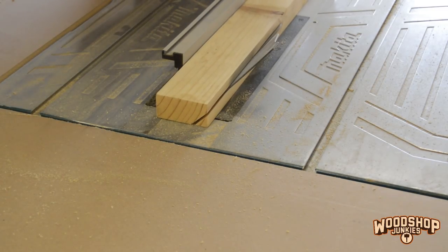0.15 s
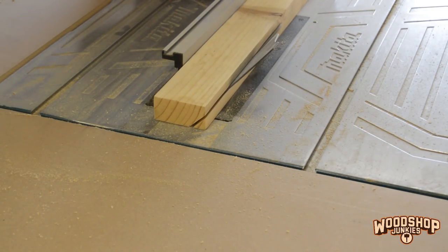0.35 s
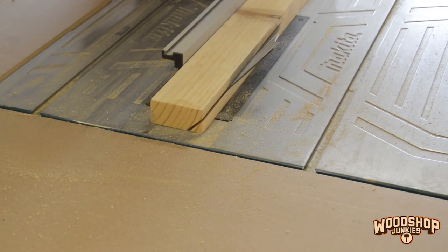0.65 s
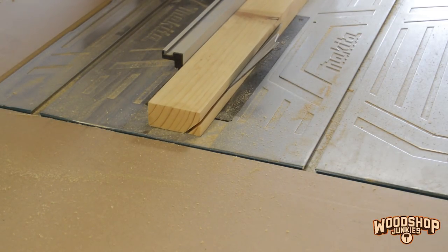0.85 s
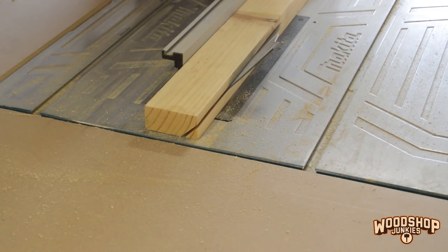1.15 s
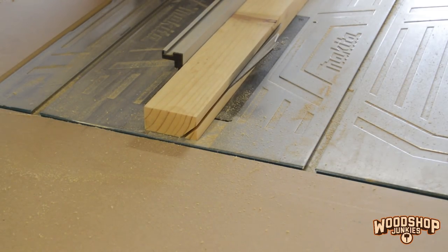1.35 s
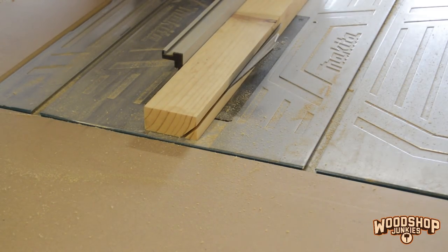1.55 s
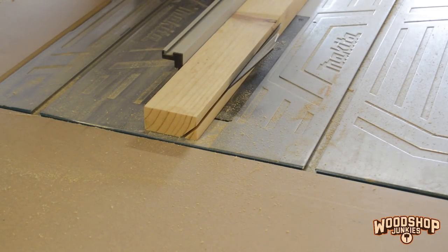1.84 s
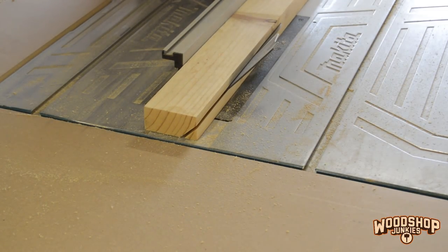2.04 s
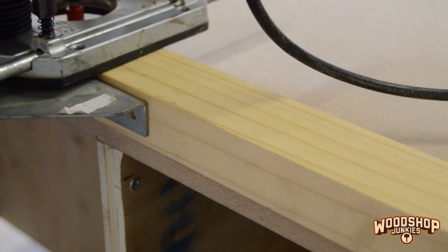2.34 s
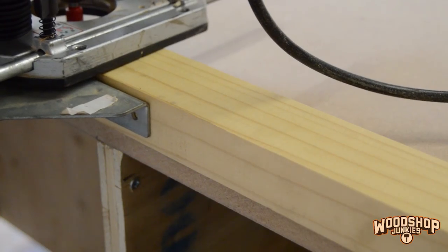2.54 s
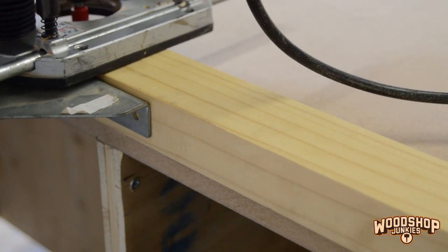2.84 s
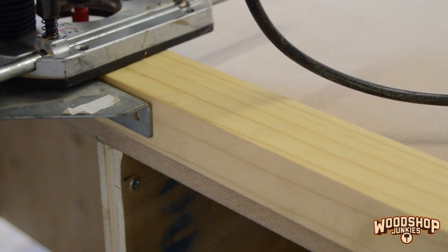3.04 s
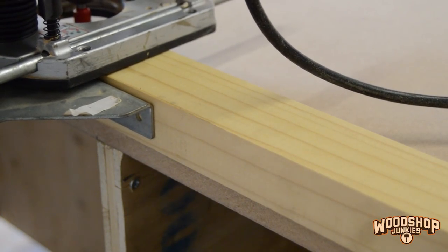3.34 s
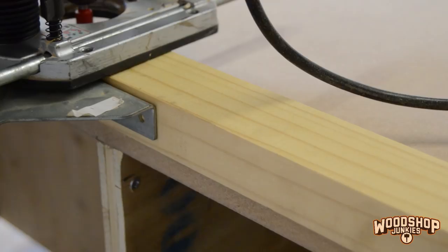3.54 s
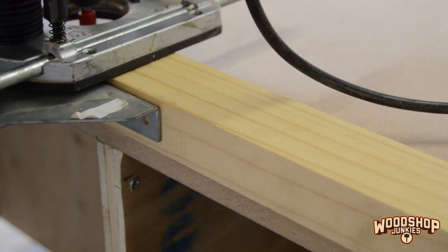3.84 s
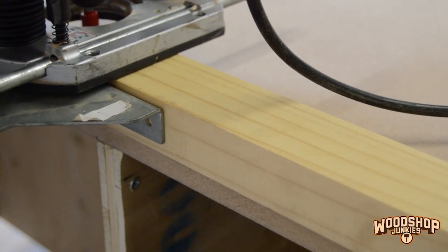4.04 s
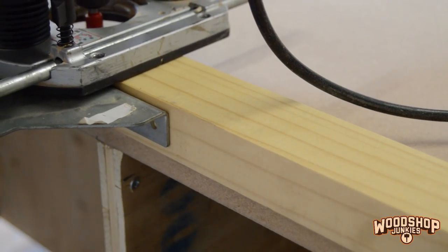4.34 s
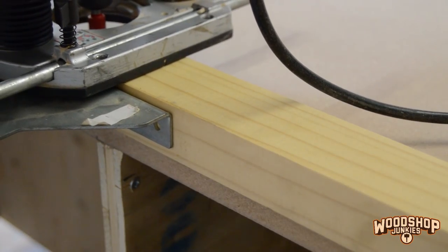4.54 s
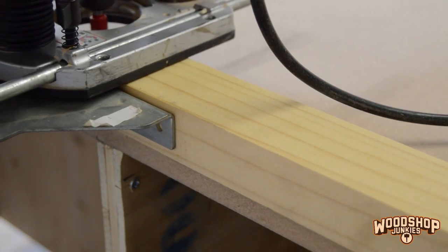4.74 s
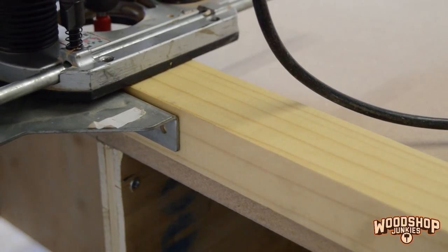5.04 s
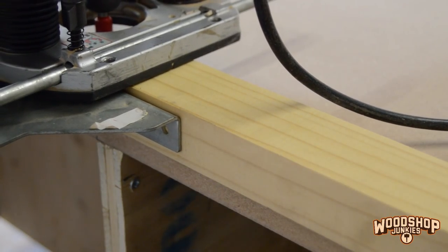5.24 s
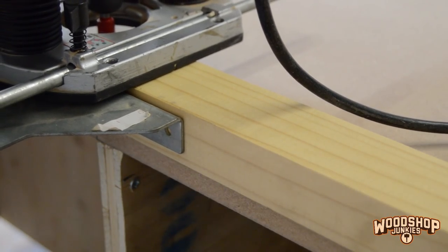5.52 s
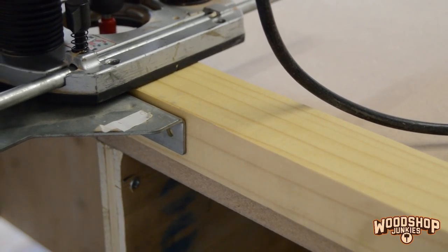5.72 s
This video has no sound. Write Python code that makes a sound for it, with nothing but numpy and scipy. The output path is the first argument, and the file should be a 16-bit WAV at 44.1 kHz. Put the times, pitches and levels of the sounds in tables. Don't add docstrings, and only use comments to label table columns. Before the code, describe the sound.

Close, dry, essentially mono workshop sound, continuously loud. From 0 to 1.3 s a table saw rips pine: a tooth whine near 2.6 kHz, wavering in strength, inside wide gritty chip noise and air hiss, with low table rumble and faint motor hum. Around 1.4 to 1.5 s the strip lets go, with a ringing squeal; the offcut drags and chatters at 1.6 to 1.75 s, then the cutting tone weakens while the pitch slides up to about 2.8 kHz. At 2.32 s it cuts instantly to a hand router coasting down with a lower, breathy whirr. At 2.51 s it kicks on with a short rough jolt, zips up to a peak at 2.7 s, and sags until 3.02 s. Then it surges again, climbing fast and then gradually to full speed by about 4.5 s, holding a steady, bright, rushing whine near 3.8 kHz to the end at about 6 s, still running.

```python
import sys
import numpy as np
from scipy import signal
from scipy.fft import rfft, irfft
from scipy.io import wavfile
from scipy.ndimage import uniform_filter1d

SR = 44100
rng = np.random.default_rng(int(sys.argv[2]) if len(sys.argv) > 2 else 0)


def gain_from_decibels(decibels):
    exponent = np.asarray(decibels, float) / 20
    return 10 ** exponent


def put_to_file(sound):
    columns = np.atleast_2d(sound).T
    safe = np.clip(columns, -1, 1)
    whole_steps = np.round(safe * 32767)
    wavfile.write(sys.argv[1], SR, whole_steps.astype(np.int16))


N = 259308
CUT_S = 2.316
FULL_HZ = 478


def columns(table):
    s, *rest = np.transpose(table)
    return [np.interp(np.arange(N) / SR, s, column) for column in rest]


def around(s, reach_s):
    return slice(max(int((s - reach_s) * SR), 0), int((s + reach_s) * SR))


def window(s, length_s):
    out, near = np.zeros(N), around(s, length_s)
    offset_s = np.arange(N)[near] / SR - s
    out[near] = np.exp(-(offset_s / (length_s / 2)) ** 4)
    return out


def swells(table):
    return sum(db * window(s, length_s) for s, length_s, db in table)


def walk(rate_hz, count):
    hold = int(SR / rate_hz / 16)
    slow = np.repeat(rng.standard_normal(count // (16 * hold) + 2), hold)
    slow = uniform_filter1d(uniform_filter1d(slow, hold), hold)
    return 1.22 * np.interp(np.arange(count) / 16, np.arange(len(slow)), slow)


def tone(hz, turns, multiple, db, flutter_db, blur_rad):
    count = len(hz)
    wander_rad = blur_rad * (walk(40, count) + 0.31 * walk(250, count))
    phase = 2 * np.pi * (multiple * turns + multiple ** 2 / np.pi) + wander_rad
    gain = np.sqrt(2) * gain_from_decibels(db + flutter_db * walk(32, count))
    return gain * np.sin(phase) * (multiple * hz < .45 * SR)


def burst(hz, turns, multiple, db, flutter_db, blur_rad, s, length_s):
    out, near = window(s, length_s), around(s, length_s)
    out[near] *= tone(hz[near], turns[near], multiple, db, flutter_db, blur_rad)
    return out


def rings(table, blur_rad):
    fixed_hz, seconds = np.ones(N), np.arange(N) / SR
    return sum(burst(fixed_hz, seconds, ring_hz, db, 1.2, blur_rad, s, length_s)
               for s, length_s, ring_hz, db in table)


def regions(shares, control_db, speed):
    return [share * control_db + db * speed for share, db in shares]


def rush(colour, hollows, centres_hz, levels_db, patchy_db):
    hz, colour_db = np.transpose(colour)
    freq = np.fft.rfftfreq(N, 1 / SR)
    lift_db = sum(db * np.exp(-((freq - centre_hz) / (width_hz / 2)) ** 2)
                  for centre_hz, width_hz, db in hollows)
    colour_db = np.interp(np.log(freq + 1), np.log(hz), colour_db)
    noise = irfft(rfft(rng.standard_normal(N)) * gain_from_decibels(lift_db + colour_db), N)
    f, t, z = signal.stft(noise, SR, nperseg=512, noverlap=384)
    frame_at = np.minimum(t * SR, N - 1).astype(int)
    swell_db = np.array([region_db[frame_at] for region_db in levels_db])
    place = np.interp(np.log(f + 1), np.log(centres_hz), np.arange(4))
    shares = np.clip(1 - np.abs(place[:, None] - np.arange(4)), 0, 1)
    patches = uniform_filter1d(rng.standard_normal(z.shape), size=9, axis=0)
    patches = uniform_filter1d(patches, size=9, axis=1) * 9
    z = z * gain_from_decibels(shares @ swell_db + patchy_db * patches)
    return signal.istft(z, SR, nperseg=512, noverlap=384)[1][:N]


def nicks(turns, colour):
    hz, db = np.transpose(colour)
    multiples_hz = np.arange(1, 2049) * 65.
    chance = rng.standard_normal((2, 2048))
    gains = gain_from_decibels(np.interp(np.log(multiples_hz), np.log(hz), db) + 4 * chance[0])
    gains = gains * (multiples_hz < hz[-1]) * (multiples_hz > 900)
    turn = irfft(np.append(0, gains * np.exp(9j * chance[1])))
    jittered = turns + .0008 * walk(30, N)
    return np.interp(jittered, np.arange(4096) / 4096, turn / turn.std(), period=1)


def saw_noise(turns, over_pct):
    # (frequency [Hz], level [dB per Hz])
    saw_colour = [(30, -45), (90, -30.5), (150, -8), (220, -16.5), (450, -12), (1000, -12), (2000, -13.5),
                  (2700, -9), (4000, -13), (5000, -9), (6000, -15.5), (10000, -13.5), (12500, -29.5),
                  (16000, -46.5)]
    # (centre [Hz], width [Hz], level [dB])
    saw_hollows = [(379, 100, 2), (498, 68, -5), (929, 98, -1), (1490, 290, -2.5), (3600, 490, 1.5),
                   (4560, 580, -3.5), (5670, 380, -2)]
    # (time [s], level [dB])
    rub = [
        (0, 1.5),
        (1.0, 1.5),
        (1.25, -0.5),
        (1.4, -0.2),
        (1.58, -2.5),
        (1.64, 4),
        (1.72, 3),
        (1.82, -1),
        (1.95, -3),
        (2.03, -0.5),
    ]
    # (share of rubbing [1], slope [dB per % overspeed])
    saw_regions = [(.3, -0.39), (.35, 0.29), (.95, 0.3144), (1.1, 0.67)]
    # (time [s], length [s], level [dB])
    shifts = [
        [(0.46, 0.14, -1), (0.978, .13, 5.5), (1.5, 0.072, -4.5), (1.41, 0.081, -4.5), (2.19, 0.28, 6),
         (1.43, 0.083, -0.5)],
        [(1.575, 0.11, 3), (1.478, 0.32, 3), (1.08, 0.34, 1.5), (1.7, .2, 0.5)],
    ]
    levels_db = regions(saw_regions, columns(rub)[0], over_pct)
    levels_db[:2] = [levels_db[k] + swells(shifts[k]) for k in range(2)]
    throb = 1 + .015 * np.sin(2 * np.pi * turns) + .05 * np.sin(4 * np.pi * turns)
    noise = gain_from_decibels(-16.5) * throb * rush(saw_colour, saw_hollows, [170, 1200, 4600, 11000], levels_db, 1.0)
    return noise + gain_from_decibels(levels_db[2] - 11) * noise.std() * nicks(turns, saw_colour)


def saw_motor(hz, turns, over_pct):
    gear = 4.783
    # (time [s], length [s], level [dB])
    hum_surges = [
        (1.47, 0.091, 5.5),
        (1.55, .06, -7),
        (1.68, .1, -3),
    ]
    # (time [s], length [s], level [dB])
    wobble_surges = [
        (.15, 0.39, -3),
        (.38, .12, -7),
        (.76, .1, -8.5),
        (1.54, .14, 5.5),
    ]
    # (motor multiple [1], level [dB])
    saw_fan = [(2, -56), (12, -47.5)]
    freed = np.clip((np.arange(N) / SR - 1.38) / .04, 0, 1)
    wobble_db = -61.5 + 3.5 * freed + swells(wobble_surges)
    hum_db = -53 + 0.91 * over_pct + swells(hum_surges)
    out = tone(hz, turns, 1, wobble_db, 1.0, .1)
    out += tone(hz, turns, gear, hum_db + 1.5, 0.49, 0.062)
    return out + sum(tone(hz, turns, gear * m, db, 2.2, .25) for m, db in saw_fan)


def saw_plate(hz, turns):
    # (time [s], length [s], blade multiple [1], level [dB])
    kerf = [(.7, 1.6, 2, -55), (.8, 1.9, 3, -51), (.7, 1.6, 4, -55), (.3, .8, 20, -53), (.25, .6, 25, -47),
            (.72, .56, 29, -47), (.22, .14, 29, -50), (.7, 1.5, 49.8, -49), (.65, .55, 56, -45),
            (.95, 1.2, 59, -49), (.4, 1.0, 60, -54), (.2, .5, 76, -55), (.45, 1.0, 79, -48),
            (.65, .5, 39, -49), (.9, .9, 95, -54), (.3, .8, 99, -48), (.4, .9, 140, -53),
            (.65, 1.4, 180, -59), (2.15, .35, 43, -48), (.85, .5, 81, -47), (2.08, .3, 81, -48),
            (2.08, .2, 121, -47), (.4, .9, 26, -54), (.4, .9, 28, -53), (.4, .9, 44, -52),
            (.6, 1.3, 96, -51), (.9, .8, 98, -51), (.25, .45, 49, -51), (.25, .45, 116, -51),
            (.25, .45, 84, -51), (1.4, .12, 72, -45), (1.66, .12, 38, -41), (1.42, .25, 36, -48),
            (1.42, .25, 32, -49), (1.45, .3, 120, -51), (1.84, .16, 21, -51), (1.36, .1, 49.5, -44),
            (.08, .16, 57.4, -46), (1.54, .08, 57.4, -44), (1.77, .1, 57.4, -44), (2.0, .5, 20, -52),
            (2.05, .45, 100, -49), (1.2, .25, 25, -52), (1.1, .2, 41, -46), (1.7, .18, 154, -47)]
    # (time [s], length [s], frequency [Hz], level [dB])
    chatter = [(1.49, .2, 3284, -39), (1.55, .09, 3292, -39), (1.655, .09, 2165, -41), (1.6, .1, 1900, -47),
               (1.68, .1, 2930, -45), (1.65, .08, 2570, -42), (1.68, .16, 1620, -49), (1.64, .1, 1890, -46),
               (1.66, .12, 4060, -42), (1.7, .14, 4990, -45), (1.7, .16, 5260, -46), (1.7, .14, 9460, -46),
               (2.23, .14, 4050, -47), (2.1, .45, 3800, -48), (1.73, .05, 3780, -42),
               (1.66, .08, 9450, -44)]
    out = sum(burst(hz, turns, m, db, 3.4, 0.19, s, length_s) for s, length_s, m, db in kerf)
    return out + rings(chatter[:2], .2) + rings(chatter[2:], .7)


def saw_teeth(hz, turns, over_pct):
    # (time [s], tooth tone level [dB])
    bite = [(0, -34), (.33, -33), (.45, -38), (.62, -38.5), (.69, -34), (.8, -35), (.9, -37.5),
            (1.0, -32.5), (1.12, -30.5), (1.27, -31.5), (1.4, -34), (1.52, -43), (1.64, -36), (1.74, -36),
            (1.82, -46), (1.94, -46), (2.03, -39), (2.3, -40)]
    # (level in the cut [dB], slope [dB per % overspeed])
    overtones = [(-42.5, 0.15), (-46, 0.6), (-51, -0.3), (-64.5, -0.35)]
    # (time [s], length [s], level [dB])
    flex = [
        [(1.32, 0.05, -11)],
        [(1.46, 0.083, -5), (1.59, 0.1, -13), (1.93, .14, -3), (.76, .18, -6), (1.41, .08, -7), (1.85, .16, -5),
         (2.3, .06, -4)],
        [(0.19, .1, 7), (0.54, 0.46, 9.5), (1.16, 0.12, 1), (1.58, 0.41, -13), (.93, .3, -6), (1.93, .22, -6),
         (.04, .08, -7), (.8, .08, -5), (.3, .06, -5), (2.1, .08, -5)],
        [(0.46, 0.3, 4), (.8, .14, 7), (1.12, 0.19, 9.5), (1.45, .2, -1)],
        [(.45, .12, 7), (.72, .25, 5)],
    ]
    # (offset [turns], level re tooth tone [dB])
    side_tones = [(-1, -10), (1, -20), (2, -19)]
    side_gain_db = [0, -2, -5, -2, 8, 6]
    tooth_db = columns(bite) + [db + slope_db * over_pct for db, slope_db in overtones]
    tooth_db = [db + swells(bends) for db, bends in zip(tooth_db, flex)]
    tooth_db.append(tooth_db[-1] - 10)
    out, cut = np.zeros(N), around(0, CUT_S + .1)
    hz, turns = hz[cut], turns[cut]
    for k, db in enumerate(tooth_db):
        teeth = 40 * (k + 1)
        out[cut] += tone(hz, turns, teeth, db[cut] - .6, 1.7, .24 + .07 * k)
        for off, under_db in side_tones:
            out[cut] += tone(hz, turns, teeth + off, db[cut] + under_db + side_gain_db[k], 3.0, .45)
    return out


def saw():
    # (time [s], tooth rate [Hz])
    tooth_rate = [
        (0, 2592),
        (.3, 2594),
        (.8, 2588),
        (1.27, 2597),
        (1.39, 2634),
        (1.58, 2700),
        (1.71, 2708),
        (2.02, 2798),
        (2.32, 2836),
    ]
    hz = columns(tooth_rate)[0] / 40
    turns = np.cumsum(hz) / SR
    over_pct = 100 * (hz / hz[0] - 1)
    out = saw_noise(turns, over_pct) + saw_motor(hz, turns, over_pct)
    return out + saw_plate(hz, turns) + saw_teeth(hz, turns, over_pct)


def shaft_hz():
    # (time [s], shaft speed [Hz])
    blip = [
        (2.31, 132),
        (2.511, 117.5),
        (2.535, 183),
        (2.558, 218),
        (2.6, 278),
        (2.66, 318),
        (2.7, 329),
        (2.76, 326),
        (3.02, 291),
    ]
    # (share [1], time constant [s])
    run_up = [(.23, .062), (.77, .35)]
    on_s, on_hz = blip[-1]
    since_s = np.arange(N) / SR - on_s
    gap = sum(share * np.exp(-np.maximum(since_s, 0) / tau_s) for share, tau_s in run_up)
    return np.where(since_s < 0, columns(blip)[0], FULL_HZ - (FULL_HZ - on_hz) * gap)


def router_air(slow_oct):
    # (frequency [Hz], level [dB per Hz])
    router_colour = [(30, -48), (150, -29.5), (255, -31.5), (320, -20), (750, -14), (1000, -9.5),
                     (1250, -9), (1650, -6), (2900, -9), (4000, -6.5), (5200, -6.5), (10200, -6),
                     (12000, -13), (16000, -30.5)]
    # (frequency [Hz], level [dB per Hz])
    coast_colour = [(30, -52), (200, -27), (500, -15.5), (900, -13.5), (1400, -9.5), (1870, -6.5),
                    (2620, -11.5), (3100, -8), (4200, -7), (4600, -12.5), (5300, -14.5), (6700, -12.5),
                    (10000, -11), (16000, -34)]
    # (centre [Hz], width [Hz], level [dB])
    router_hollows = [(343, 41, -6), (574.4, 80, 3), (827, 88, -1.9), (1010, 104, 3), (1350, 96, -2),
                      (1610, 280, 2), (3000, 530, -1), (3980, 680, 1.5), (4656, 390, -1), (5540, 260, 2.1),
                      (6470, 360, 2.5), (7240, 570, -1), (8540, 500, -0.6), (9220, 660, 1.06)]
    # (time [s], level [dB])
    drive = [
        (2.32, -5),
        (2.51, -6),
        (2.535, 1),
        (2.58, 2.5),
        (2.65, 4),
        (2.8, -1),
        (2.98, -3),
        (3.1, 2.5),
        (3.4, 1.5),
    ]
    # (share of drive [1], gain when slow [dB])
    router_regions = [(0.97, 4), (0.46, 2), (0.63, 1.2), (0.78, 0)]
    centres_hz = [680, 1800, 5400, 11000]
    levels_db = regions(router_regions, columns(drive)[0], np.clip(slow_oct / 0.46, 0, 1))
    idle = np.clip((slow_oct - .9) / 0.73, 0, 1)
    air = np.sqrt(1 - idle) * gain_from_decibels(-18.5) * rush(router_colour, router_hollows, centres_hz, levels_db, 0.52)
    whirr = np.sqrt(idle) * gain_from_decibels(-15) * rush(coast_colour, [], centres_hz, levels_db, 0.86)
    return air + whirr


def router_casing(hz, turns):
    # (time [s], length [s],
    # shaft multiple [1], level [dB], roughness [rad])
    shaft_bursts = [(2.4, .19, 14, -41, .2), (2.37, .12, 14.9, -37, .25), (2.45, .1, 14.6, -39.5, .25),
                    (2.41, .2, 28.6, -45, .5), (2.39, .16, 30, -45, .5), (2.41, .2, 34, -47, .5),
                    (2.41, .2, 12, -47, .5), (2.41, .2, 6.1, -52, .4), (2.41, .2, 8.9, -50, .4),
                    (2.52, .02, 12, -33, .6), (2.551, .024, 12, -30.5, .9), (2.536, .014, 12, -25.5, 1.2),
                    (2.546, .02, 11.2, -34, 2.5), (2.545, .03, 10.5, -35, 1.3), (2.553, .014, 7.6, -37, 1.5),
                    (2.588, .036, 8, -35.5, 1.0), (2.527, .022, 24, -34, 1.2), (2.56, .06, 17, -43, 1.5),
                    (2.665, .1, 12, -39, 1.0), (3.13, .13, 16, -44, .2), (2.75, .12, 16, -46, .5),
                    (3.75, .35, 12, -54, .4), (2.8, .2, 12, -47, .5), (3.08, .12, 12, -47, .5),
                    (3.15, .25, 32, -52, .3), (3.42, .28, 4, -48, .4), (4.05, .14, 12, -49, .6),
                    (5.3, 1.3, 4, -57, .1), (5.2, 1.5, 3, -50, .1), (2.88, .36, 48, -61, .3),
                    (2.88, .3, 32, -53, .6), (4.08, .3, 3, -46, .2), (2.77, .26, 2, -50, .5),
                    (3.2, .26, 2, -52, .8)]
    # (time [s], length [s], frequency [Hz], level [dB])
    casing = [
        (2.58, 0.092, 10150, -36.5),
        (2.61, 0.12, 63, -66),
        (2.93, 0.11, 150, -62.5),
    ]
    out = sum(burst(hz, turns, m, db, 1.5, rough_rad, s, length_s) for s, length_s, m, db, rough_rad in shaft_bursts)
    return out + rings(casing, 0.89)


def router_whine(hz, turns, slow_oct):
    # (shaft speed [Hz], unbalance [dB], fan [dB], fan 2nd [dB])
    answer = [(118.4, -51, -42, -61), (130.8, -48, -45, -55), (238.5, -70, -40.5, -58),
              (302, -43, -46, -60.5), (362, -42, -37, -53), (430, -43, -42, -42), (453, -52, -42, -38.5),
              (481.6, -46, -37.5, -46)]
    # (time [s], length [s], level [dB])
    beats = [
        [(2.67, 0.045, 0.5), (2.77, 0.042, 6), (2.84, .03, -7), (3.025, 0.029, -9), (3.11, 0.0193, -16),
         (3.2, 0.028, 6), (3.3, 0.0364, -12), (3.53, .07, 5), (3.82, 0.19, 4), (4.12, 0.19, -10.5)],
        [(2.57, 0.071, -1.5), (2.87, 0.4, -6), (3.17, .2, -2.5), (3.76, 0.064, -8), (4.6, 0.146, 1.5),
         (4.8, .16, -4), (3.355, 0.0265, -8), (3.4, 0.048, 5.5), (3.49, .04, 7), (3.52, 0.026, -3),
         (3.84, 0.071, 4.5), (4.05, 0.12, 3), (4.28, 0.17, 4), (4.4, 0.64, 2.5), (5.62, 0.46, -3.5)],
        [(2.76, .24, 8.5), (3.0, .07, -8), (3.13, 0.13, 6), (3.5, .2, 2), (3.75, .22, -1), (4.1, 0.29, 2.5),
         (4.6, 0.45, 5), (5.1, 0.4, -3), (5.7, .5, 4.5)],
    ]
    # (shaft multiple [1], level at full speed [dB], loss [dB per octave slow])
    router_orders = [(2, -55, 5), (3, -51, 16), (4, -52, 6), (6.36, -48, 30), (7, -52, 8), (9, -55, 8),
                     (15, -56, 8), (12, -48, 25), (20, -54, 10), (24, -48.5, 8), (27, -56, 20),
                     (32, -61, 30)]
    speeds_hz, *answers_db = np.transpose(answer)
    unbalance_db, *fan_db = [np.interp(hz, speeds_hz, db) + swells(beats[k]) for k, db in enumerate(answers_db)]
    out = tone(hz, turns, 1, unbalance_db, 1.0, 0.19)
    out += sum(tone(hz, turns, m, db - .5, 1.4, .14) for m, db in zip((8, 16), fan_db))
    return out + sum(tone(hz, turns, m, db - loss_db * slow_oct, 2.0, .1) for m, db, loss_db in router_orders)


def router():
    hz = shaft_hz()
    turns = np.cumsum(hz) / SR
    slow_oct = np.log2(FULL_HZ / hz)
    return router_air(slow_oct) + router_casing(hz, turns) + router_whine(hz, turns, slow_oct)


def scene():
    splice = np.clip((np.arange(N) / SR - CUT_S) / 0.0019, 0, 1)
    mono = (1 - splice) * saw() + splice * router()
    return np.array([mono, mono])


def roll_off(x):
    return signal.sosfilt(signal.butter(12, 15760, fs=SR, output="sos"), x)


def record(dry):
    # (time [s], low edge [Hz], high edge [Hz])
    swaps = [(.093, 4000, 5400), (.093, 10200, 11800), (.441, 4000, 5400), (.58, 10200, 12500),
             (.58, 14400, 15700), (.813, 4000, 5400), (.836, 12300, 13800), (1.533, 14400, 15700),
             (1.579, 5000, 6400), (1.788, 10200, 11800), (2.229, 6200, 7600), (2.229, 14400, 15700),
             (2.949, 10900, 13800), (2.972, 8200, 9700), (3.437, 4000, 5400), (3.971, 9500, 11200),
             (4.412, 5000, 6400), (4.574, 4400, 5800), (4.667, 4000, 5800), (4.853, 10200, 11800),
             (5.55, 9500, 11200), (5.735, 5500, 7000), (5.735, 12900, 14500)]
    out, time_s = dry.copy(), np.arange(N) / SR
    for s, low_hz, high_hz in swaps:
        near = around(s, .12)
        sos = signal.butter(8, [low_hz, high_hz], "band", fs=SR, output="sos")
        band = signal.sosfiltfilt(sos, dry[0, near])
        turn_rad = np.pi / 2 * np.clip(1 - np.abs(time_s[near] - s - .004) / .019, 0, 1) ** .8
        fill = np.array([np.roll(band, 2500), np.roll(band, -2500)])
        out[:, near] += (np.cos(turn_rad) - 1) * band + np.sin(turn_rad) * fill
    return roll_off(out)


dry = scene()
out = record(dry)
put_to_file(out)
```